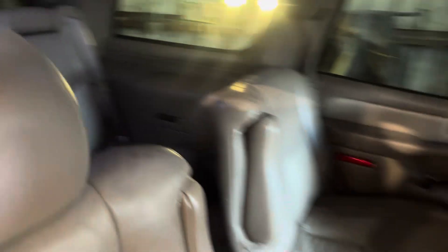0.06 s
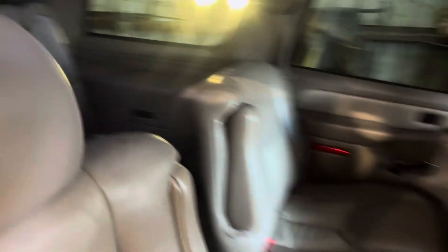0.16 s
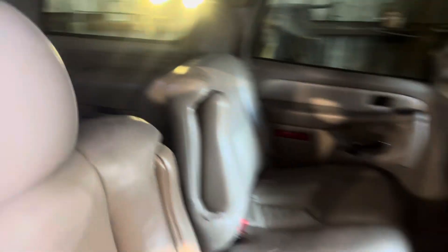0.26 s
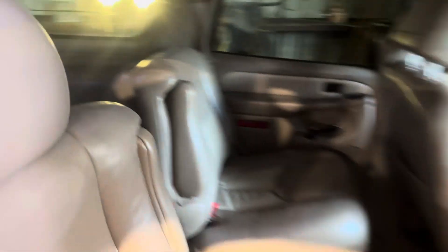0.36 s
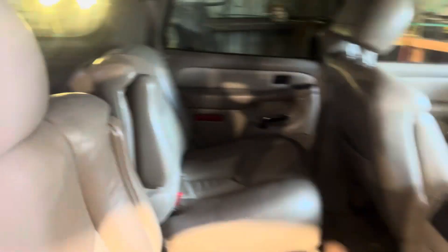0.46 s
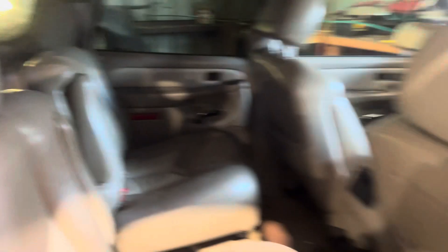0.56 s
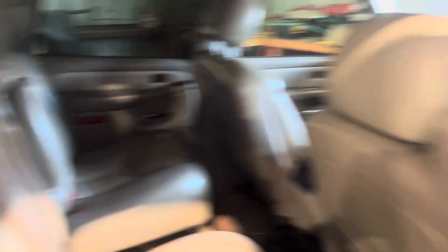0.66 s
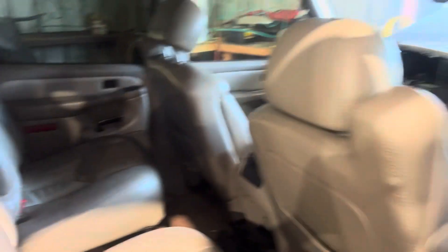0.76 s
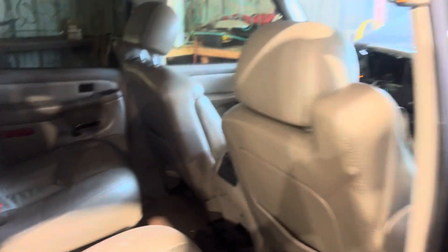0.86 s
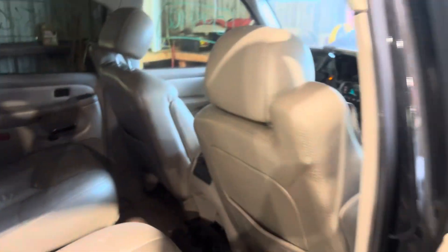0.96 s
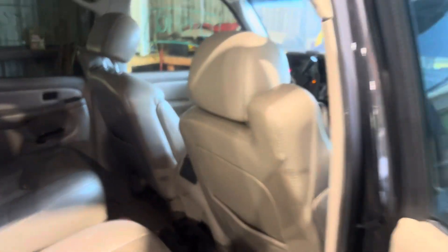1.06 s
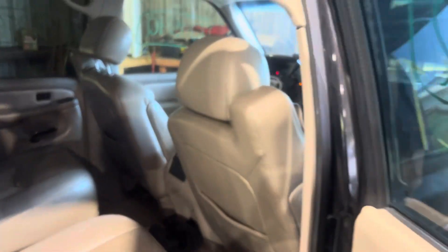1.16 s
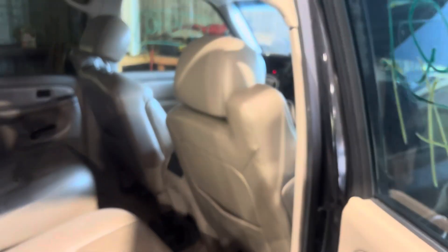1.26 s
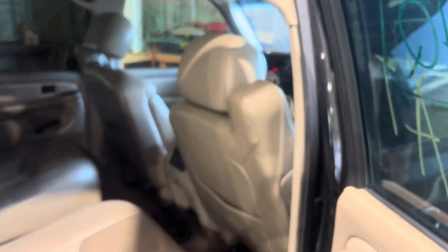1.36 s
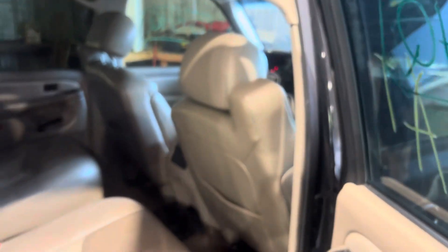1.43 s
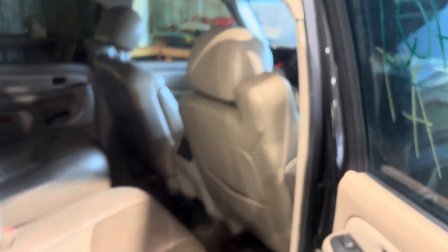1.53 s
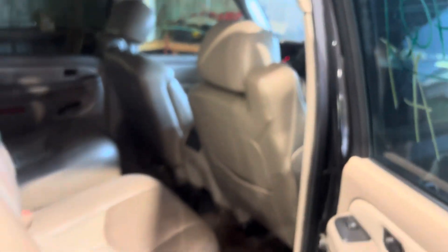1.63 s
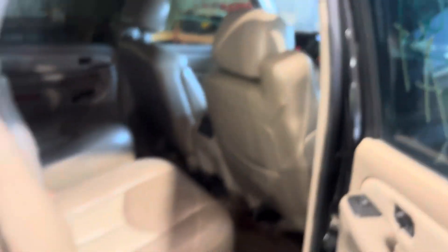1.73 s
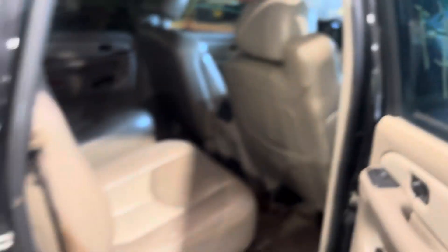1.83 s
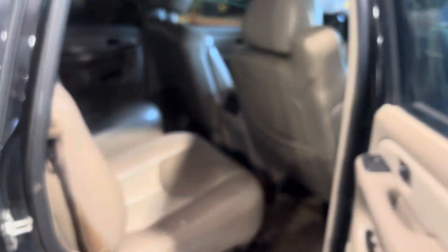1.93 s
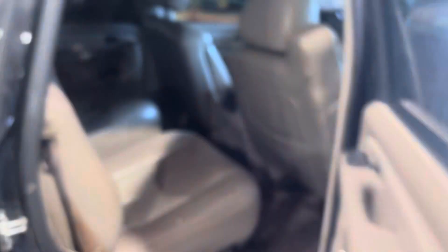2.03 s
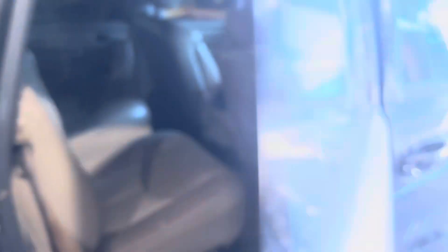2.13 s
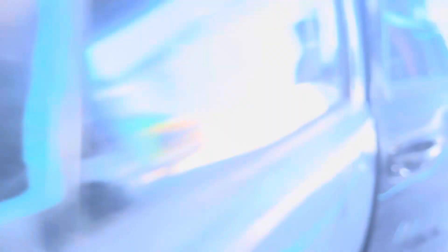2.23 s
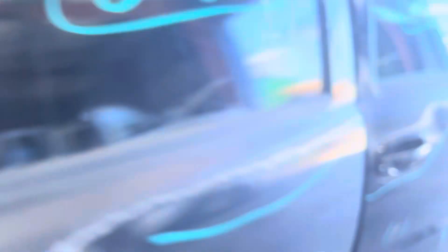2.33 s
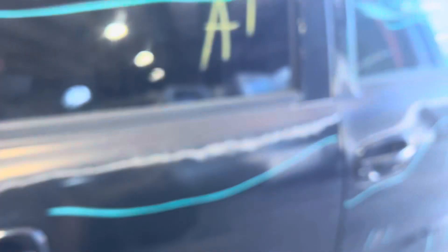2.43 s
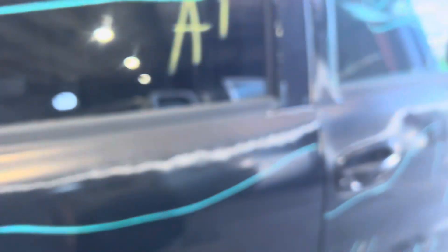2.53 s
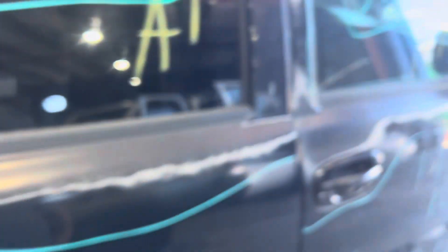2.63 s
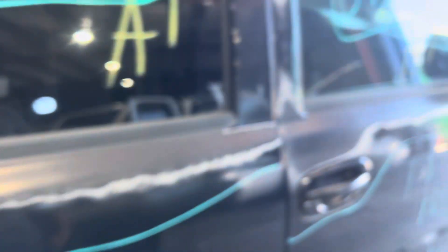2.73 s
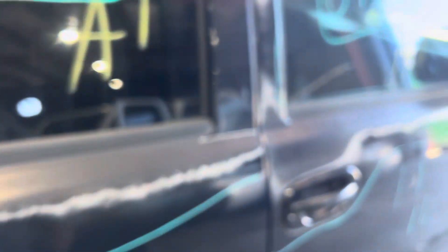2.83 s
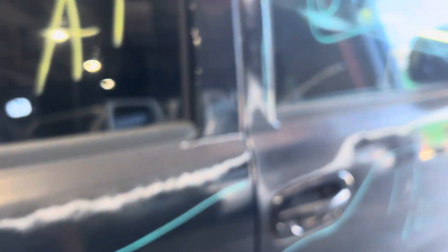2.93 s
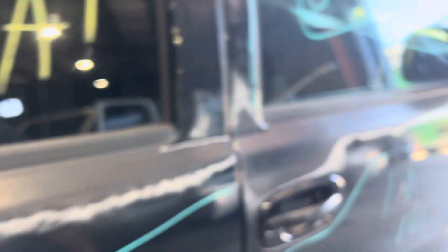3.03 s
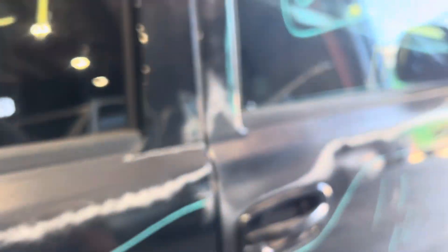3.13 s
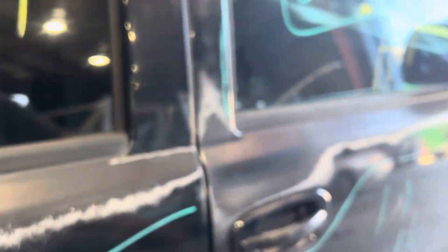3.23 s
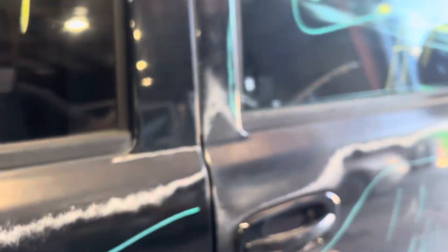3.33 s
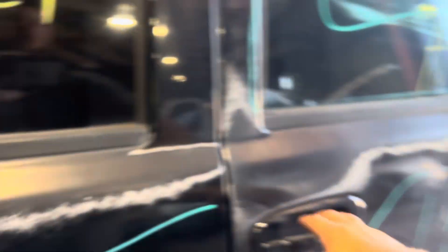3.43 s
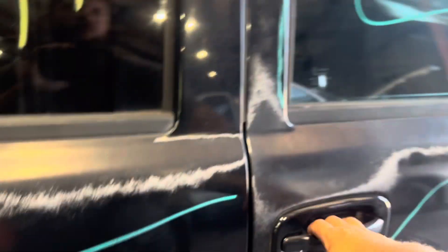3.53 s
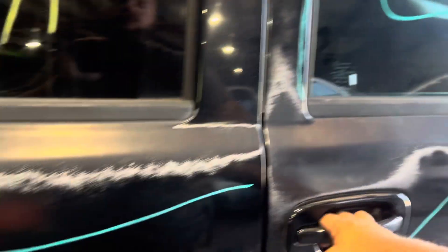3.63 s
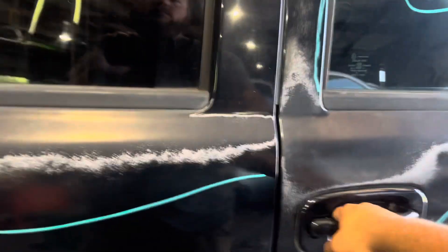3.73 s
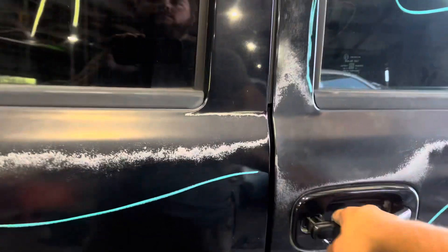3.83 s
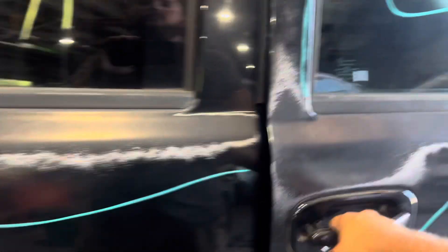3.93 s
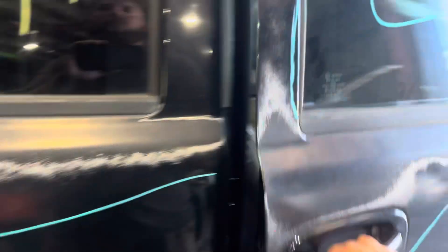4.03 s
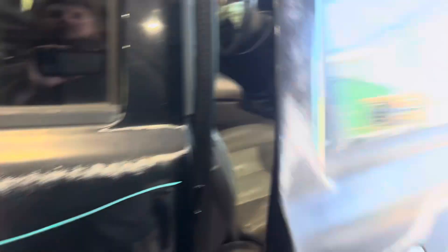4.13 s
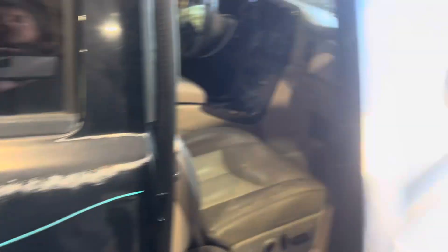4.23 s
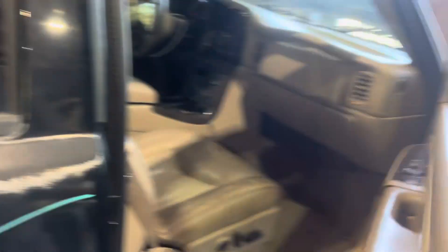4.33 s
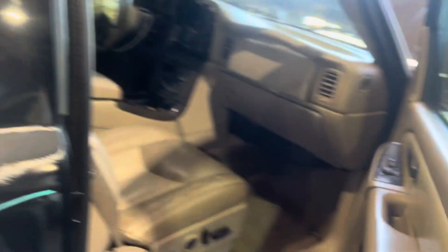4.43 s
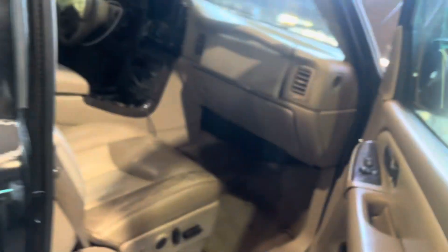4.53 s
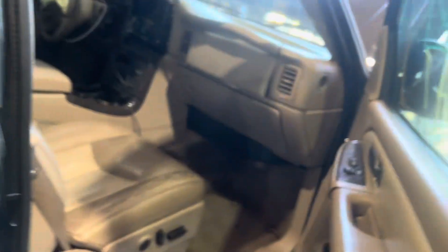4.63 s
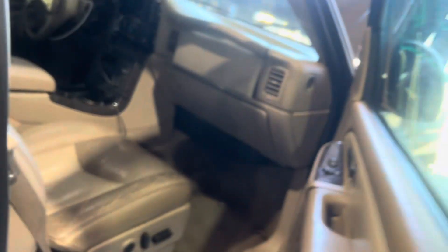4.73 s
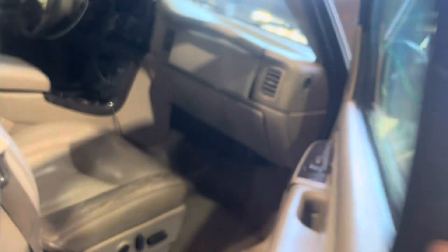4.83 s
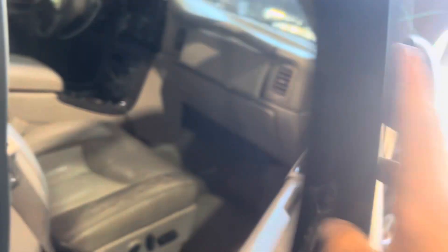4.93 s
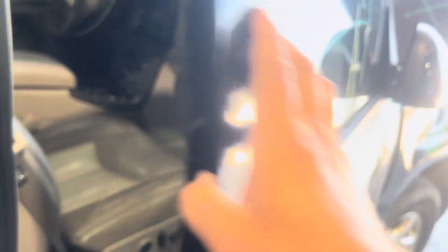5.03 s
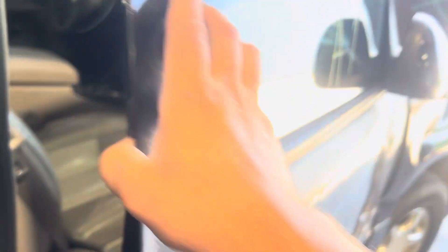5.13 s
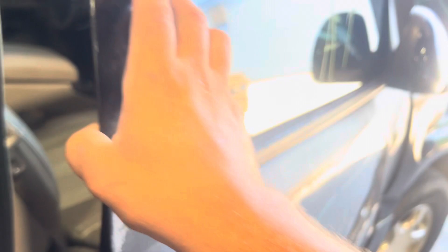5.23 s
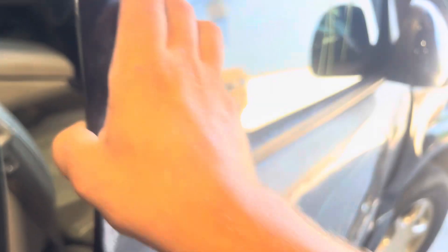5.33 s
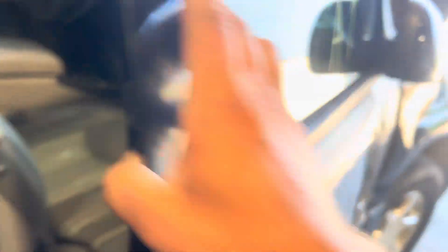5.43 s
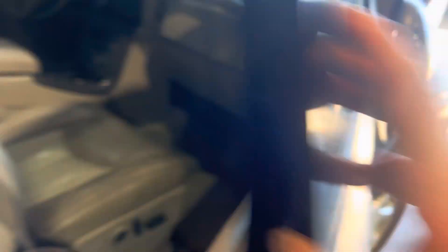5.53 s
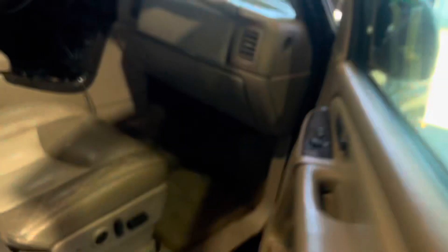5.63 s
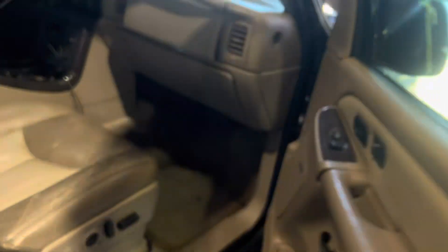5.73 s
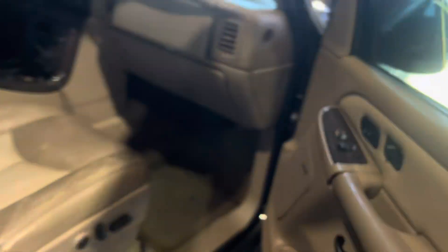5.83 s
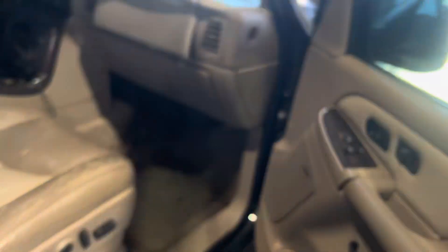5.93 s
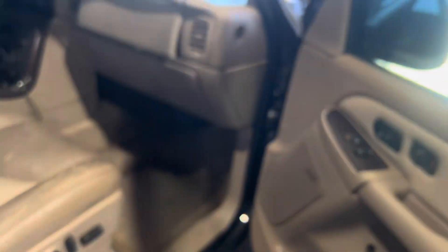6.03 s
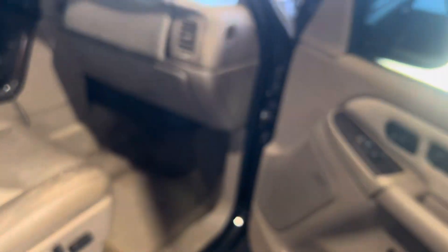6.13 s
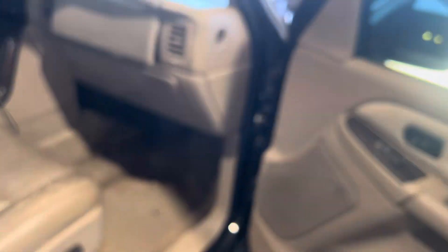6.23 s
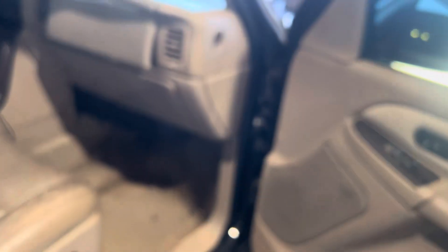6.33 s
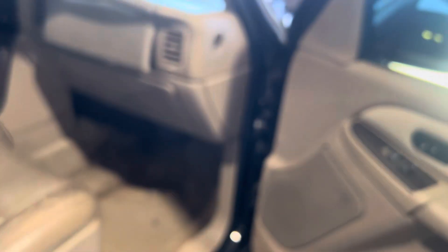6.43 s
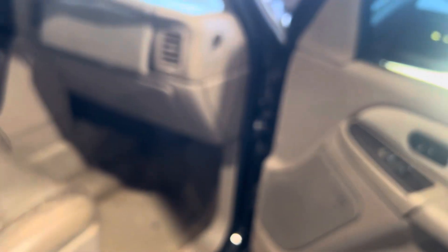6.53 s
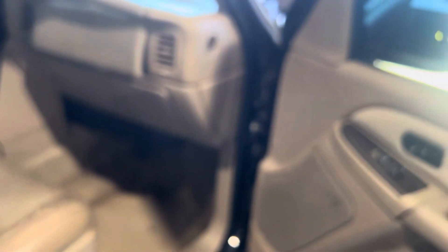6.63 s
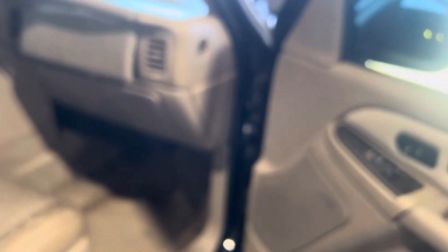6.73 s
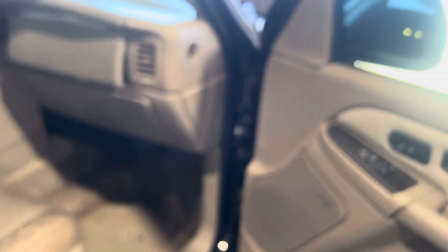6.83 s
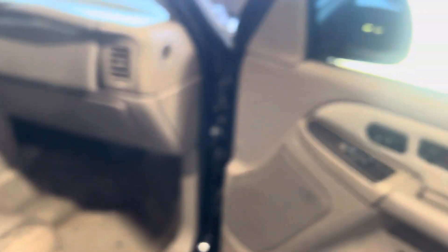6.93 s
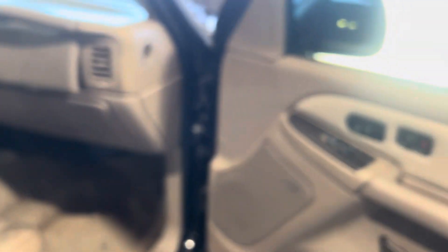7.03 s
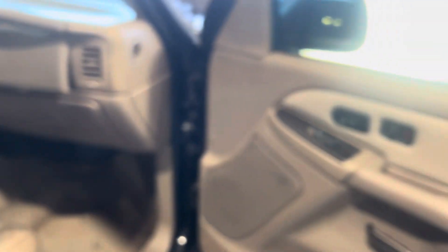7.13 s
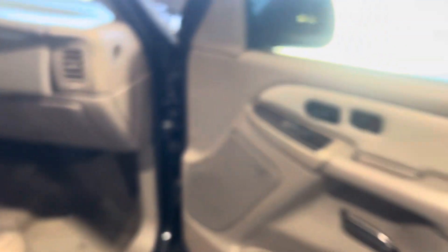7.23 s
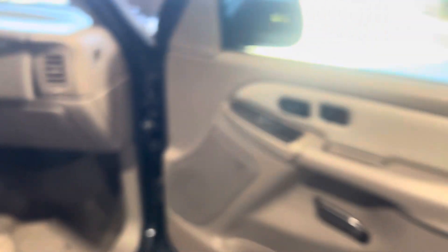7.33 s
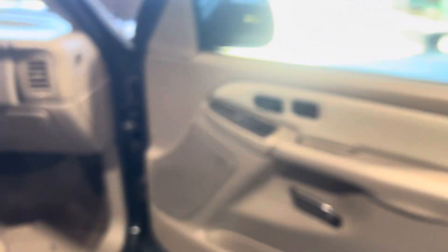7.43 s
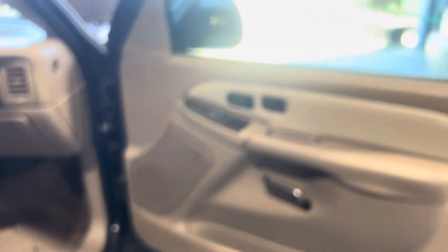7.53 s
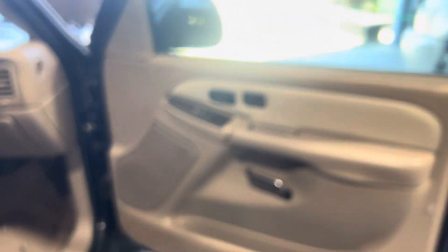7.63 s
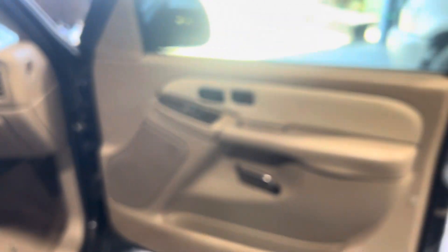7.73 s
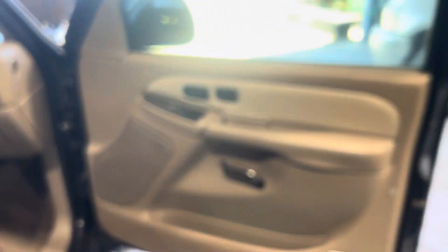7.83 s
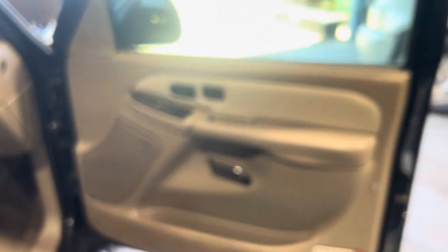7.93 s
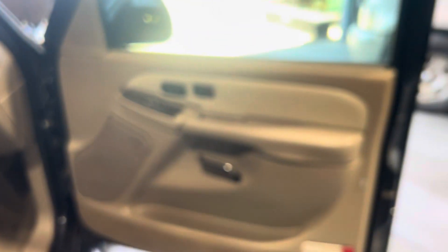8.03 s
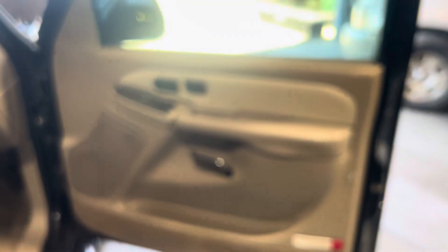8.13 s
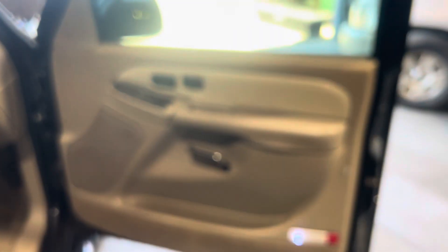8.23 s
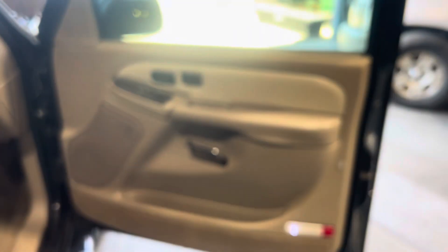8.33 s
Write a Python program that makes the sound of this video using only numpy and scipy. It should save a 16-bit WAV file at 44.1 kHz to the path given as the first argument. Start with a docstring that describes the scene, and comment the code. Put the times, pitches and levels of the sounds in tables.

```python
"""Inside a humming workshop a car door slams softly and shoes scuff; a handle and latch then knock.
A second door is pulled open: its dry hinge clacks in noisy bursts, each clack with a short note,
the panel booms, and the check strap chatters in hollow knocks that fall in pitch.
The hall is drifting filtered noise; a hand-held pair of microphones hears it fade as it leans
into the cabin. Scuffs are gritty noise, thumps are sliding tones, and sparse echoes follow the car."""
import sys
import numpy as np
from scipy import signal
from scipy.fft import rfft, irfft, next_fast_len
from scipy.io import wavfile
from scipy.ndimage import uniform_filter1d

SR = 44100
rng = np.random.default_rng(int(sys.argv[2]) if len(sys.argv) > 2 else 0)


def master(y):
    """Save y as 16-bit WAV."""
    cut = np.clip(np.atleast_2d(y).T, -1, 1)
    pcm = np.round(cut * 32767)  # scale
    wavfile.write(sys.argv[1], SR, pcm.astype(np.int16))


N = 369116

# hall noise as the microphones move: time_s, rumble_db, roar_db, throb_db
HALL_LEVELS = [(0, -36, -37.5, -40.5), (.55, -32, -33, -27), (1.1, -32.5, -32, -32.5), (2.4, -32, -32, -30),
               (2.6, -33, -35, -26.5), (2.9, -31, -31.5, -31), (3.9, -29, -32, -35.5),
               (4.25, -31, -32.5, -35), (4.6, -36.5, -35, -52), (5.548, -36.5, -38.5, -39),
               (6.0, -35.5, -41, -50), (6.4, -44.5, -45.5, -46.5), (7.3, -45.5, -44, -46.5),
               (7.7, -42.5, -41.5, -39.5), (8.37, -45.5, -43, -48.5)]
# relative spectra of the hall's rumble, deep throb and broad roar: pitch_hz, level_db (per Hz)
RUMBLE_SPECTRUM = [(45, -48), (70, -4.5), (100, 2.5), (147, -2.5), (190, -20.5), (233, -5.5), (376, -8.5),
                   (700, -16), (910, -58)]
THROB_SPECTRUM = [(15, -27), (32, -3), (48, 24), (60, 14), (75, 15), (100, -41.5)]
ROAR_SPECTRUM = [(240, -21), (400, -11), (508, -7), (672, -6), (988, -3), (1100, -3.5), (1470, 0),
                 (2170, -7.5), (3940, -20.5), (5420, -16.5), (7070, -29), (8180, -26), (9600, -36),
                 (12500, -102)]
# wavering machine tones: pitch_hz, width_hz, level_db (re rumble, before the cabin shields them)
MACHINE_TONES = [(103.6, 6, -4), (185.4, 11.8, -1.5), (283.4, 9.8, -12)]
# the cabin shields the machine tones: time_s, level_db (re rumble)
TONE_SHIELDING = [(0, 2), (3.5, -2.5), (6.5, -1.5)]
# likeness of the hall at left and right: pitch_hz, likeness (-1 to 1)
HALL_LIKENESS = [(60, 0.92), (180, 0.96), (550, 0.14), (1650, 0.047), (4970, -0.072), (15000, 0.07)]
# shuffles of a shoe or cloth: start_s, length_s, level_db, rise_s,
# top_db (above 7930 Hz) and body_db (below 2510 Hz), both re level_db, sheen_hz (bright band centre)
SCUFF_STROKES = [(0.57, 0.12, -26, 0.065, -2, 2, 4960), (0.686, 0.083, -28.5, 0.024, -5, -3, 5200),
                 (0.755, 0.14, -35.5, 0.03, -6, 3.5, 5000), (0.887, 0.082, -30.5, 0.065, 8, 5, 5930),
                 (1.508, 0.14, -39, .02, 1, -2, 5630), (2.821, 0.2, -33, 0.042, 1, 4, 5700),
                 (3.075, 0.067, -34, 0.032, -4, -8, 6400), (3.243, 0.13, -31.5, 0.023, 3.5, -3, 6000),
                 (3.255, 0.11, -36, 0.015, -9, -9, 4280), (3.656, 0.11, -39, 0.026, -3, 7, 5500),
                 (5.014, 0.2, -37.5, 0.0074, -6, 8, 5400), (7.306, 0.38, -44, 0.035, 11.5, 3, 6060)]
# filter shape of the scuff layer, with a dip near 10 kHz: pitch_hz, level_db (per Hz)
SCUFF_FILTER = [(710, -32), (1300, 0.5), (2200, -2), (3500, -5.5), (6500, -7.5), (8510, -22), (10300, -38),
                (11500, -18.5), (15500, -31)]
# dull blows whose note drops: start_s, peak_db, start_hz, end_hz, left_over_right_db
BLOWS = [(0.455, -21, 121, 60.6, 14), (0.624, -24, 90, 57, 15), (0.911, -15.5, 62, 58, 8),
         (0.914, -26, 1510, 626, 0), (0.929, -14.5, 60, 52.4, 4), (0.946, -15, 56.3, 52, 7),
         (1.749, -11, 207, 71, 1), (2.438, -11, 354, 235, 4), (2.446, -5, 251, 116, -3),
         (2.466, -6, 214, 70, 1), (2.471, -8.5, 430, 181, 0), (2.496, -13.5, 302, 170, -3),
         (2.53, -16.5, 200, 130, -1), (2.491, -16, 90, 55.6, 0), (2.522, -10.5, 59.4, 49.3, -6),
         (3.837, -11.5, 370, 253, 2), (3.843, -16.5, 280, 198, -1), (3.848, -17, 119, 69, 1),
         (4.009, -10.5, 754, 354, 1), (4.015, -11.5, 355, 184, 0), (5.794, -8.5, 370, 215, 2),
         (5.895, -18, 246, 117, 6), (7.326, -10, 477, 61.7, 7.5), (7.427, -23, 544, 56.6, 5),
         (7.568, -24, 510, 91, 6)]
# hollow knocks of the check strap: start_s, peak_db, pitch_hz,
# tick_db and overtone_db (re peak), after_ring_t60_s
STRAP_KNOCKS = [(4.373, -7.5, 473.4, -13, -12, 0.29), (5.038, -4, 445.5, -62, -25, 0.13),
                (5.066, -11.5, 422, -30, -23, 0.3), (5.786, -6, 484, -20, -4, 0.14),
                (5.988, -9, 410, -38, -30, 0.047), (6.014, -11, 458, -39, -27, 0.055),
                (6.038, -14, 443, -38, -23, 0.081), (6.068, -9.5, 429, -30.5, -14.5, 0.1),
                (6.112, -10, 383, -29, -7, 0.14), (6.151, -10.5, 392, -41, -11, 0.099),
                (6.183, -14.5, 472, -30, -3, 0.066), (6.212, -17.5, 363, -41, -7, 0.23),
                (6.238, -15, 378, -43, -16, 0.21), (6.256, -19, 399, -38, -8, 0.091)]
# short metallic clacks of slam, latch and hinge: start_s, clank_db,
# boom_db and tick_db (re clank), pitch_hz
CLACKS = [(0.911, -13, -4, -13, 1980), (2.435, -4, -14, -10, 1650), (2.44, -7.5, -8, -18, 990),
          (3.836, -18, 3.5, -28, 1140), (4.011, -16, 1, -26, 1445), (4.223, -10.5, -5, -45, 865),
          (4.231, -9, -7.5, -44, 1140), (4.262, -8.5, -9.5, -8, 1430), (4.279, -5, -20, 0, 1400),
          (4.303, -8, -9, 3, 1470), (4.375, -8, -10, -6, 906), (4.396, -7, -5, 4, 1260),
          (4.42, -5, -14, -12, 1390), (4.456, -6.5, -19, -7.5, 1250), (4.476, -3, -17, -11, 1290),
          (4.526, -2.5, -11.5, -9, 1300), (4.791, -5, -8.5, -8, 1570), (4.803, -6.5, -16, -12, 1364),
          (4.805, -2.5, -23, -12, 2240), (4.821, -9.5, -10, -6, 1500), (4.906, -18.5, -2.5, -14, 1020),
          (4.923, -15, -5, -20, 1000), (5.032, -16.5, 1.5, 15, 1670), (5.036, -5, -23, -5, 1470),
          (5.569, -12.5, -3, -26, 754), (5.598, 0, -22, -3, 1490), (5.628, -5, -14, -16, 1390),
          (5.642, -9, -18.5, -25, 1270), (5.654, -1.5, -32, -18, 1420), (5.668, -7, -21, -10, 1366),
          (5.676, -7, -17, -16, 1300), (5.689, -2.5, -20, -15, 1390), (5.707, -1.5, -11.5, -17, 1290),
          (5.72, -6, -9, -10, 1220), (5.73, -9.5, -20, -1, 1235), (5.748, 1, -26, -16, 1330),
          (5.764, -5.5, -5.5, -21.5, 1200), (5.856, -8, -3, -4, 790), (5.88, -7.5, -20, -11.5, 1596)]
# door shaking or hinge dragging without pause: start_s, length_s, clank_db,
# then shudder_db, boom_db and tick_db (re clank)
HINGE_DRAGS = [(2.44, 0.034, -22, -21, 5, -15), (4.23, 0.046, -24.5, -29, 4, -46),
               (4.265, 0.062, -21, -29, -7, -7.5), (4.375, 0.12, -20.5, -8, -2, -9.5),
               (4.53, 0.019, -24.5, 1, 4.5, -18), (4.817, 0.015, -22.5, -2, -0.5, -10.5),
               (4.903, 0.026, -20, -8.5, 2.5, -24), (5.048, 0.034, -26.5, -21, -4, -5.5),
               (5.569, 0.06, -18.5, -11, -6, -15), (5.624, 0.17, -23, -2.5, 2, -7),
               (5.868, 0.025, -23.5, 2, 5.5, -9), (5.99, 0.31, -45, 13.5, 13, -28)]
# resonances of the whole door on its hinges: pitch_hz, width_hz, level_db
DOOR_MODES = [(101.2, 3.7, -0.5), (133.4, 11, -8.5)]
# resonances of the door panel: pitch_hz, width_hz, level_db
PANEL_MODES = [(239, 8.4, -17), (335, 100, -3.5), (358, 77, -10), (486, 59, 3), (555, 38, -2),
               (726, 120, -7.5)]
# resonances of the metallic clank: pitch_hz, width_hz, level_db
CLANK_MODES = [(837, 27, -8), (1050, 150, -1), (1186, 65, 0.5), (1314, 100, 4), (1483, 94, 3.5),
               (1610, 56, 0), (1756, 200, -0.5), (2083, 79, -4.5), (2430, 100, -11)]
# relative spectrum of the bright contact: pitch_hz, level_db (per Hz)
TICK_SPECTRUM = [(1500, -19.5), (2500, 1.5), (4000, -0.5), (5400, -1), (7100, -11), (8300, -10),
                 (9400, -16.5), (10500, -44), (15500, -33)]
# uneven microphone pair: pitch_hz, left_over_right_db
MIC_LEAN = [(60, 0.5), (160, 1.5), (450, 2.5), (740, 1.5), (1220, 7), (2010, 7), (3330, -3), (5500, 4.5),
            (9080, -4), (15000, 2)]
# overall treble roll-off of both channels: pitch_hz, level_db
TREBLE_ROLLOFF = [(8500, -0.5), (10500, -8.5), (16000, -14.5)]

BODY_HZ, TOP_HZ = 2510, 7930  # edges of a scuff's low and top bands
GRAIN_DB = 3.5  # scuffs wander in narrow bands by this much (rms)
SHEEN_DB, SHEEN_WIDTH_HZ = 5, 500  # each stroke lifts one bright band
SCUFF_SAG_DB, SCUFF_T60_S = -9.5, 0.13  # past its peak each stroke tires, then dies away
SWELL_CYCLES = 0.87  # a blow peaks about one cycle of its end note after it lands
KNOCK_DROP, KNOCK_DROP_S = 0.37, 0.0025  # each knock starts sharp by this share and settles
PING_DB, PING_PEAK_S = -4.5, 0.0024  # clean note of a clack, re clank, and the time to its peak
RATTLE_DB = -6  # noisy rattle around that note, re clank
CLACK_T60_S, CLACK_RISE_S = 0.045, 0.003  # clank decay and rise
CLACK_LEAN_DB = -0.5  # left over right
DRAG_RISE_S, DRAG_SAG_DB, DRAG_T60_S = 0.016, -1, 0.15
CLANK_SHARE = 0.52  # clank dB per tick dB: a softer catch loses clank slower than tick
LAG_S = 0.00019  # the hinge side is nearer the right microphone
LOW_HZ, EDGE_HZ = 40.8, 15800  # the microphones lose the deepest bass; upper band limit
CEILING = 0.95  # loudest swing of the input stage


def gain_of(db):
    """Decibels to amplitude."""
    return 10 ** (np.asarray(db) / 20)


def evened(x):
    """Scales to rms 1."""
    return x / np.sqrt(np.mean(x ** 2) + 1e-20)


def read(points, hz):
    """Reads a spectrum on a log-frequency axis."""
    f, value = np.transpose(points)
    return np.interp(np.log(hz + 1), np.log(f + 1), value)


def add(mix, s, sound):
    """Mixes a sound in at time s."""
    part = mix[..., round(s * SR):][..., :sound.shape[-1]]
    part += sound[..., :part.shape[-1]]


def colour(x, points):
    """Filters so that unit white noise comes out at rms 1 with this spectrum."""
    size = next_fast_len(N)
    response = evened(gain_of(read(points, np.fft.rfftfreq(size, 1 / SR))))
    return irfft(rfft(x, size) * response, size)[..., :N]


def ring(x, modes):
    """Parallel decaying resonances; unit white noise comes out at rms 1."""
    t = np.arange(4096) / SR
    tail = 0
    for hz, width, db in modes:
        tail = tail + gain_of(db) * width * np.exp(-np.pi * width * t) * np.sin(2 * np.pi * hz * t)
    return signal.oaconvolve(x, tail[None] / np.linalg.norm(tail), axes=1)[:, :N]


def likened(a, b, same):
    """Left and right made from two independent noises, with the given likeness."""
    same = np.clip(same, -1, 1)
    return np.array([a, same * a + np.sqrt(1 - same ** 2) * b])


def pair(same):
    """White noise for left and right with the given likeness."""
    return likened(*rng.standard_normal((2, N)), same)


def grit(per_s, spread_db, decay_s):
    """Lumpy envelope of many tiny catches that each decay exponentially, rms 1."""
    catches = gain_of(spread_db * np.minimum(rng.exponential(1, N), 4)) * (rng.random(N) < per_s / SR)
    return evened(signal.lfilter([1], [1, -np.exp(-1 / (decay_s * SR))], catches))


def stroke(length, rise, sag_db, t60):
    """Gain of one stroke: it rises, sags until its end, then dies away."""
    t = np.arange(0, length + .3, 1 / SR)
    tired = np.clip((t - rise) / max(length - rise, .001), 0, 1)
    fall_db = sag_db * tired ** 2 - 60 * np.maximum(t - length, 0) / t60
    return np.minimum(t / rise, 1) * gain_of(fall_db)


def hall():
    """Diffuse rumble, wavering machine tones, deep throb and a broad roar, with drifting patches."""
    frames, hz = N // 512 + 5, np.fft.rfftfreq(2048, 1 / SR)
    t = np.arange(frames) * 512 / SR
    a, b, c, d, patches = rng.standard_normal((5, 1025, frames))
    patches = evened(uniform_filter1d(uniform_filter1d(patches, 16, 0), 6, 1))
    s, *levels = np.transpose(HALL_LEVELS)
    rumble_db, roar_db, throb_db = [np.interp(t, s, level) for level in levels]
    hum_db = rumble_db + np.interp(t, *np.transpose(TONE_SHIELDING))

    hum = 0
    for tone_hz, width, db in MACHINE_TONES:
        line = np.exp(-((hz - tone_hz) / width) ** 2)
        hum = hum + gain_of(db) ** 2 * line / line.sum()
    power = np.outer(hum, gain_of(hum_db) ** 2)
    layers = [(RUMBLE_SPECTRUM, rumble_db), (THROB_SPECTRUM, throb_db), (ROAR_SPECTRUM, roar_db)]
    for points, level_db in layers:
        spectrum = gain_of(read(points, hz)) ** 2
        power += np.outer(spectrum / spectrum.sum(), gain_of(level_db) ** 2)

    z = likened(a + 1j * b, c + 1j * d, read(HALL_LIKENESS, hz)[:, None])
    # the last factor makes up for the overlap of unrelated frames
    z *= np.sqrt(power) * gain_of(1.53 * patches) * np.sqrt(3 / 2)
    return signal.istft(z, nperseg=2048, noverlap=1536)[1][:, :N]


def room(x):
    """Sparse echoes of random sign from the car's side and the hall, dying exponentially."""
    at = np.arange(300, 13000, 20) + rng.integers(0, 20, (2, 635))  # one per 20 samples, jittered
    echoes = rng.choice([-1., 1.], at.shape) * gain_of(-60 * at / SR / 0.46)
    taps = np.zeros((2, 13100))
    np.put_along_axis(taps, at, echoes, 1)
    return signal.oaconvolve(x, taps / np.linalg.norm(taps[0]), axes=1)[:, :N]


def scuffs():
    """Dense fine grit under a swelling stroke, each with its own body, bright band and top level."""
    rasp = grit(4000, 1, .004) * (1 + .08 * grit(90, 1, .015))
    hz, t, z = signal.stft(colour(pair(0.11) * evened(rasp), SCUFF_FILTER), SR, nperseg=256)
    grain = rng.standard_normal(z.shape[1:])
    grain = evened(uniform_filter1d(uniform_filter1d(grain, 3, 0), 12, 1))
    z = z * evened(gain_of(GRAIN_DB * grain))
    power = np.zeros(z.shape[1:])
    for s, length, db, rise, top_db, body_db, sheen_hz in SCUFF_STROKES:
        rub = np.zeros(N)
        add(rub, s, stroke(length, rise, SCUFF_SAG_DB, SCUFF_T60_S))
        sheen = SHEEN_DB * np.exp(-((hz - sheen_hz) / SHEEN_WIDTH_HZ) ** 2)
        tone_db = db + top_db * (hz > TOP_HZ) + body_db * (hz < BODY_HZ) + sheen
        power += np.outer(gain_of(tone_db), np.interp(t * SR, np.arange(N), rub)) ** 2
    return signal.istft(z * np.sqrt(power), nperseg=256)[1][:, :N]


def thumps():
    """Each blow is a few cycles sliding from a knock down to a boom that swells and dies."""
    out, t = np.zeros((2, N)), np.arange(SR // 3) / SR
    for s, db, start_hz, end_hz, pan_db in BLOWS:
        turns = np.cumsum(end_hz + (start_hz - end_hz) * np.exp(-t / 0.0029)) / SR
        swell = np.exp(-.9 * (t * end_hz / SWELL_CYCLES - 1) ** 2)
        swell += 0.053 * gain_of(-60 * t / 0.23)  # faint longer tail
        sides = gain_of([[db + pan_db / 2], [db - pan_db / 2]])
        add(out, s, sides * swell * np.sin(2 * np.pi * turns))
    return out


def strap():
    """Each catch is a hollow knock of about two cycles, falling in pitch, with overtone and after-ring."""
    out, t = np.zeros(N), np.arange(SR // 3) / SR
    for s, db, hz, _, over_db, t60 in STRAP_KNOCKS:
        knock = np.minimum(t / 0.0023, 1) * np.exp(-((t - .0035) / 0.0027) ** 2)
        after_ring = 0.46 * (1 - np.exp(-(t / 0.0086) ** 3)) * gain_of(-60 * t / t60)
        turns = np.cumsum(hz * (1 + KNOCK_DROP * np.exp(-t / KNOCK_DROP_S))) / SR
        tone = np.sin(2 * np.pi * turns) + gain_of(over_db) * np.sin(2 * np.pi * 780 * t)
        add(out, s, gain_of(db) * (knock + after_ring) * tone)
    return out


def pings():
    """Each clack has a brief clean note of its own pitch that swells and dies within milliseconds."""
    out, t = np.zeros(N), np.arange(SR // 20) / SR
    u = t / PING_PEAK_S
    shape = (u * np.exp(1 - u)) ** 2  # peaks at u = 1
    for s, db, _, _, hz in CLACKS:
        add(out, s, gain_of(db + PING_DB) * shape * np.sin(2 * np.pi * (hz * t + rng.random())))
    return out


def clacks_and_drags():
    """Clacks, strap catches and hinge drag drive noise through panel, clank and tick resonances."""
    force, t = np.zeros((3, 2, N)), np.arange(SR // 5) / SR  # boom, clank and tick
    side = gain_of([[CLACK_LEAN_DB / 2], [-CLACK_LEAN_DB / 2]]) * np.minimum(t / CLACK_RISE_S, 1) ** 2
    for s, db, boom_db, tick_db, _ in CLACKS:
        # decay re clank: the panel rings longer, the tick shorter
        parts = [(boom_db, 1.8), (RATTLE_DB, 1), (tick_db, .42)]
        for k, (rel_db, ring_on) in enumerate(parts):
            add(force[k], s, side * gain_of(db + rel_db - 60 * t / (CLACK_T60_S * ring_on)))
    for s, db, _, tick_db, *_ in STRAP_KNOCKS:
        add(force[1], s, gain_of(db + CLANK_SHARE * tick_db - 60 * t / 0.15)[None])
        add(force[2], s, gain_of(db + tick_db - 60 * t / 0.079)[None])

    catches = grit(2000, 1.1, .0025)
    drag = np.zeros((4, N))  # boom, clank, tick and shudder
    for s, length, db, shudder_db, boom_db, tick_db in HINGE_DRAGS:
        parts = gain_of(db + np.array([[boom_db], [0], [tick_db], [shudder_db]]))
        add(drag, s, parts * stroke(length, DRAG_RISE_S, DRAG_SAG_DB, DRAG_T60_S))

    boom, clank, tick = np.hypot(force, catches * drag[:3, None])
    out = ring(drag[3] * pair(1.0), DOOR_MODES)
    out = out + ring(boom * pair(1.0), PANEL_MODES)
    out = out + ring(clank * pair(0.17), CLANK_MODES)
    return out + colour(tick * pair(0.1), TICK_SPECTRUM)  # the tick is filtered noise


def scene():
    """Car and shoes in the hall; the door's hinge side reaches the left microphone later."""
    left, right = clacks_and_drags() + strap() + pings()
    car = np.array([np.roll(left, round(LAG_S * SR)), right]) + thumps()
    return hall() + scuffs() + car + gain_of(-14) * room(car)


def record(dry):
    """An uneven microphone pair: treble rolls off, deep bass is lost, loud peaks saturate; band limit."""
    size = next_fast_len(N)
    hz = np.fft.rfftfreq(size, 1 / SR)
    colour_db = np.outer([.5, -.5], read(MIC_LEAN, hz)) + read(TREBLE_ROLLOFF, hz)
    heard = irfft(rfft(dry, size) * gain_of(colour_db), size)[:, :N]
    heard = signal.sosfilt(signal.butter(2, LOW_HZ, "high", fs=SR, output="sos"), heard)
    limited = heard / (1 + (heard / CEILING) ** 4) ** (1 / 4)
    band_limit = signal.firwin(511, EDGE_HZ, window=("kaiser", 9), fs=SR)
    return signal.oaconvolve(limited, band_limit[None], "same")


dry = scene()
out = record(dry)
master(out)
```